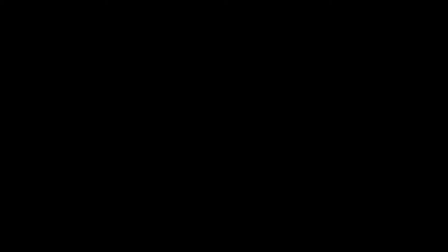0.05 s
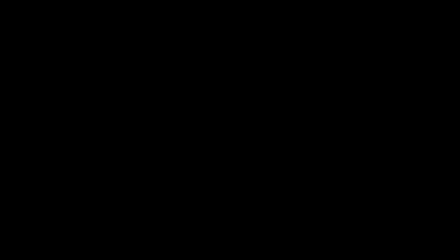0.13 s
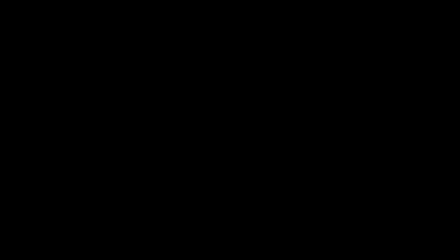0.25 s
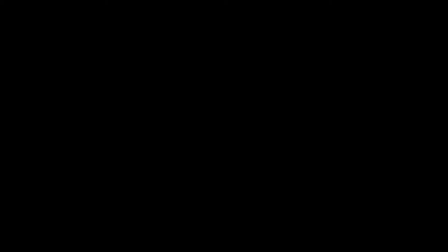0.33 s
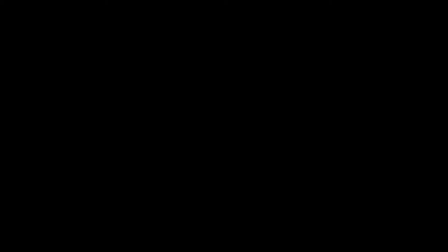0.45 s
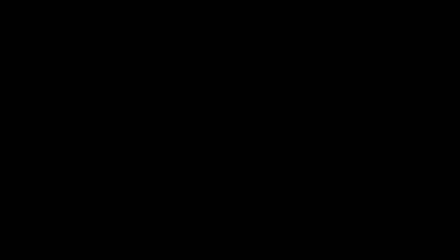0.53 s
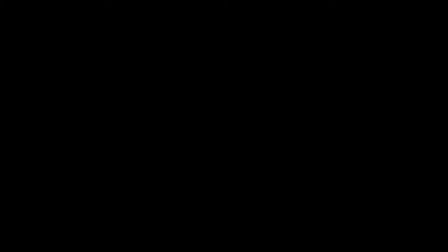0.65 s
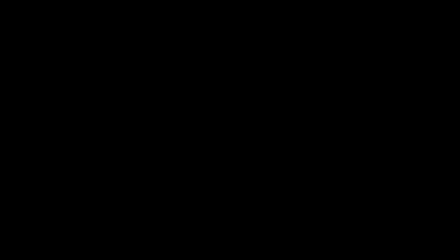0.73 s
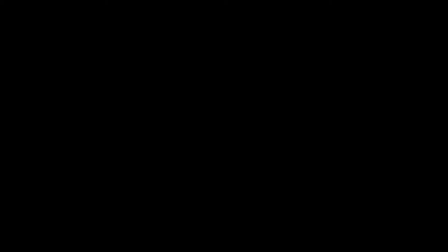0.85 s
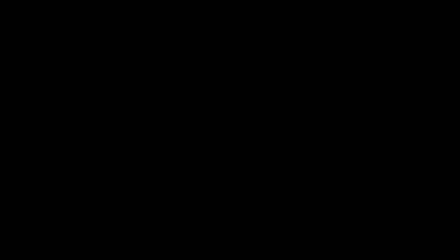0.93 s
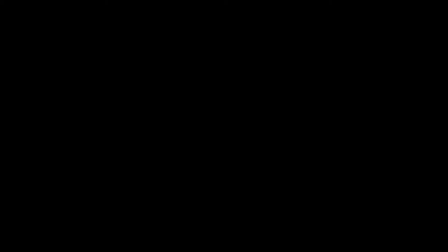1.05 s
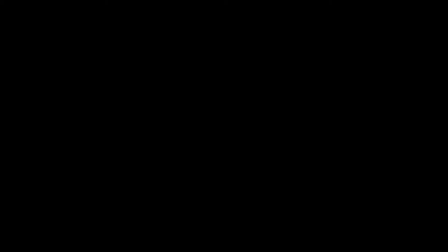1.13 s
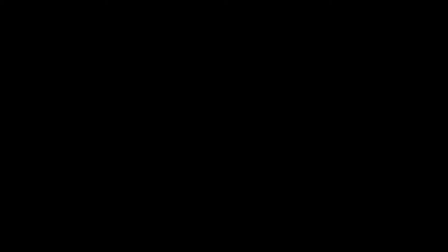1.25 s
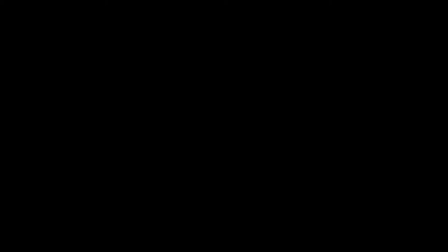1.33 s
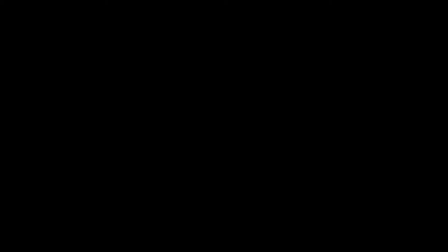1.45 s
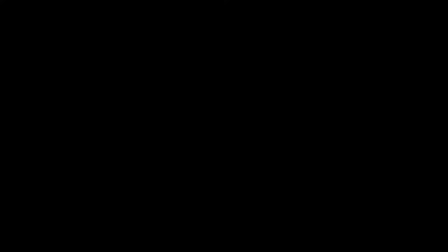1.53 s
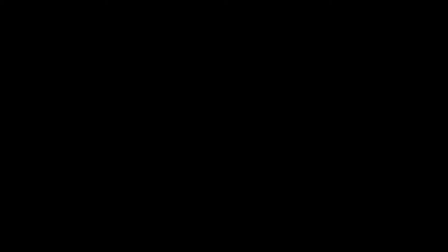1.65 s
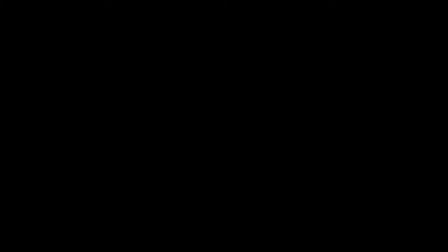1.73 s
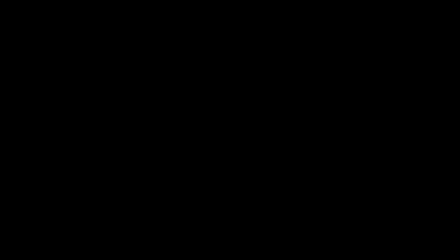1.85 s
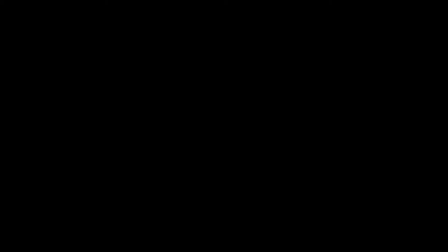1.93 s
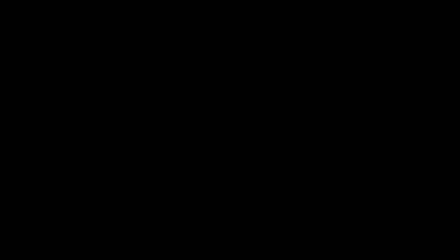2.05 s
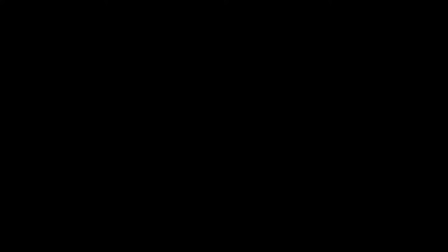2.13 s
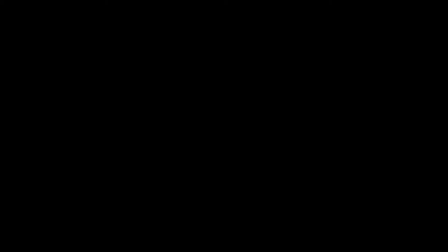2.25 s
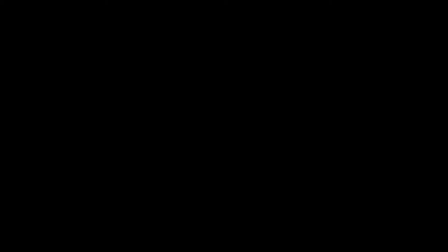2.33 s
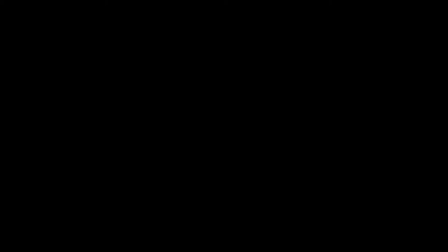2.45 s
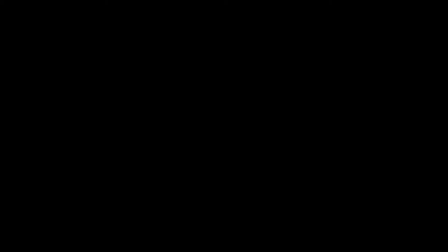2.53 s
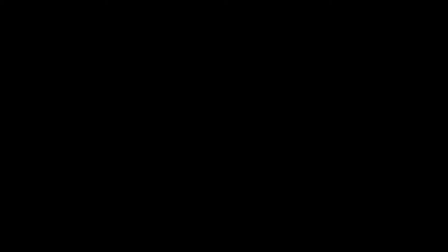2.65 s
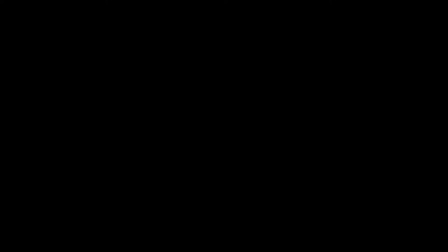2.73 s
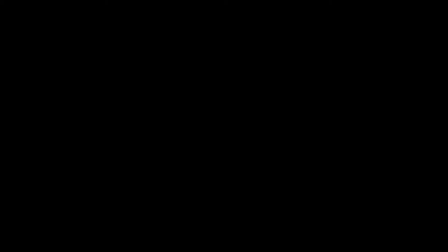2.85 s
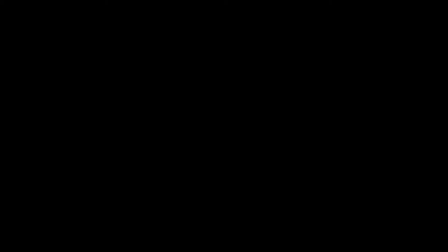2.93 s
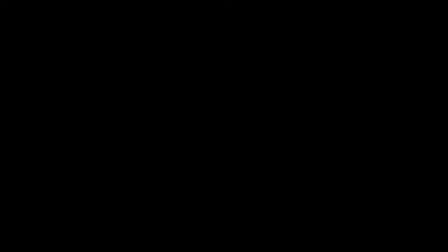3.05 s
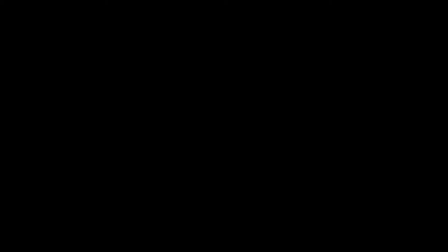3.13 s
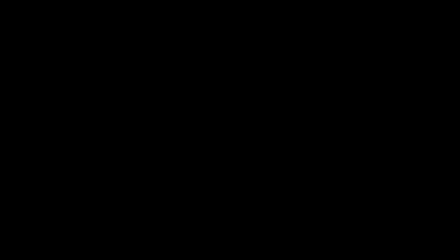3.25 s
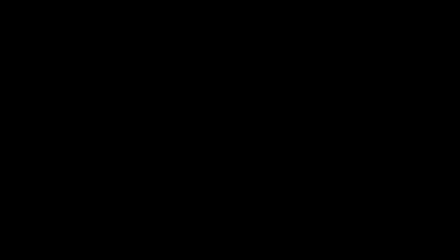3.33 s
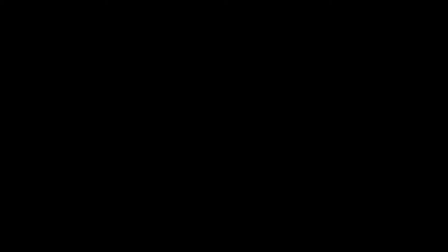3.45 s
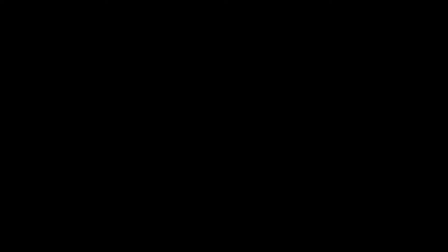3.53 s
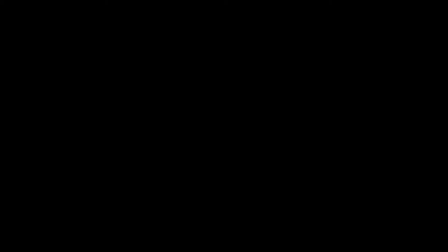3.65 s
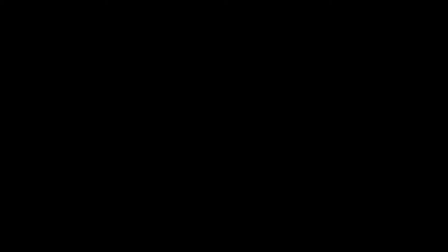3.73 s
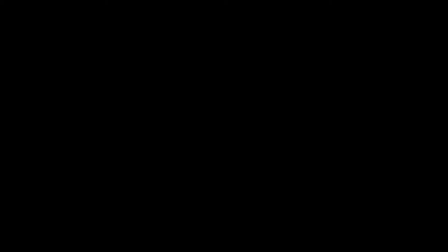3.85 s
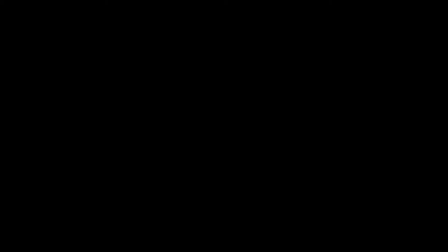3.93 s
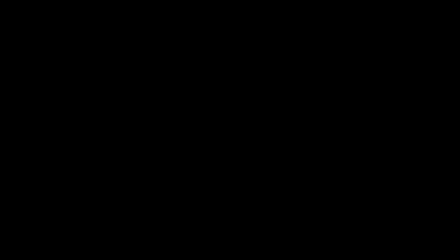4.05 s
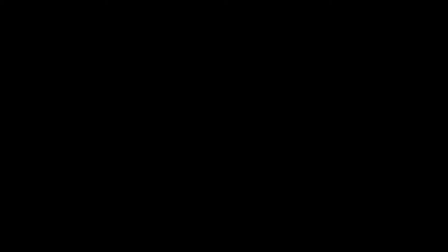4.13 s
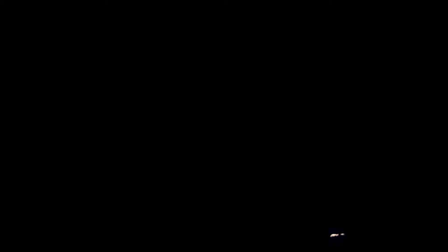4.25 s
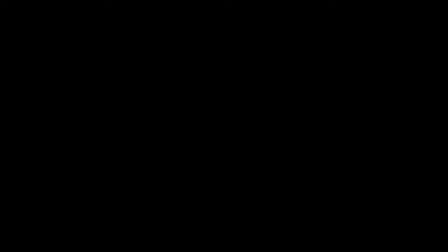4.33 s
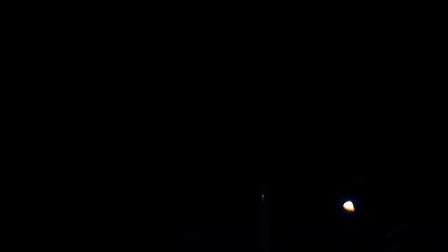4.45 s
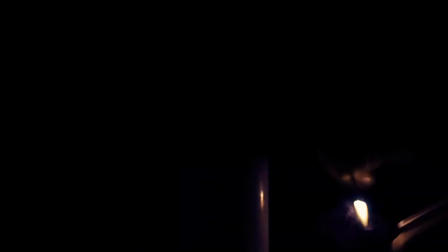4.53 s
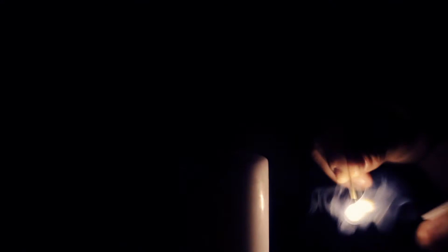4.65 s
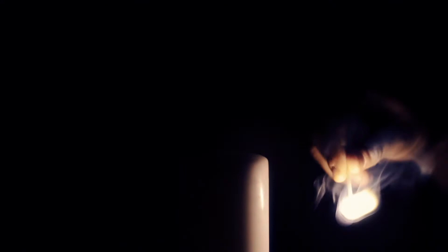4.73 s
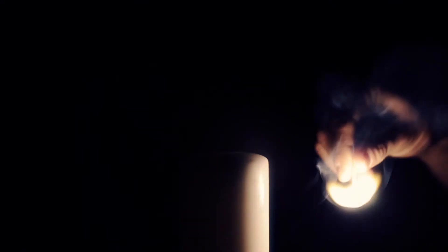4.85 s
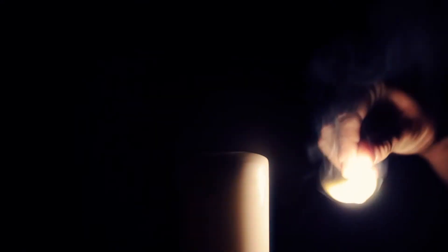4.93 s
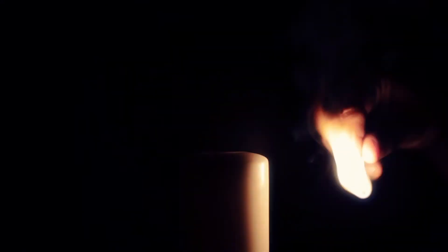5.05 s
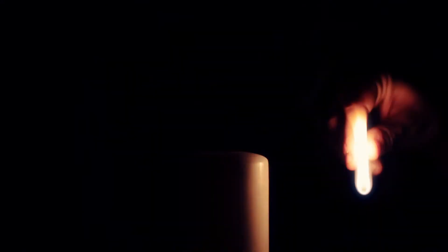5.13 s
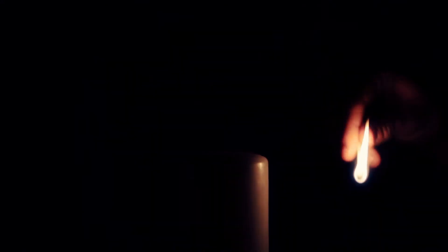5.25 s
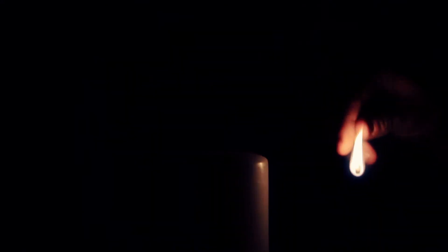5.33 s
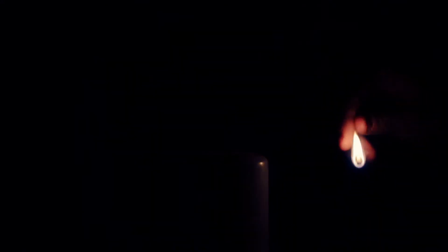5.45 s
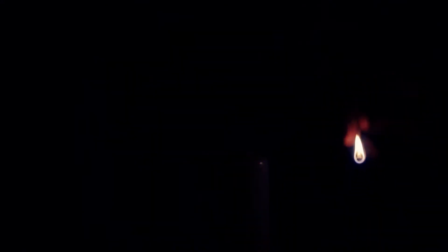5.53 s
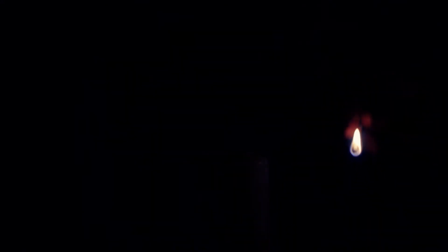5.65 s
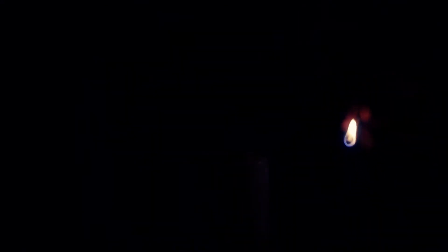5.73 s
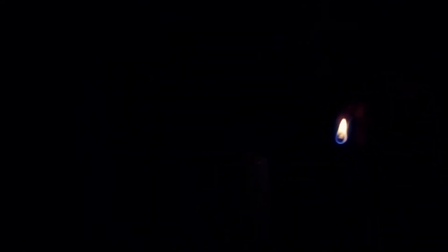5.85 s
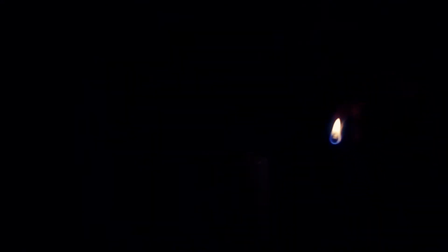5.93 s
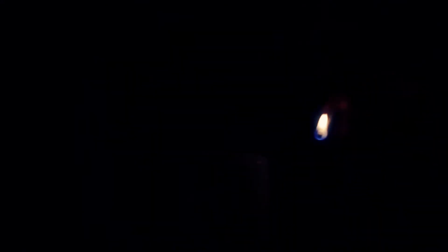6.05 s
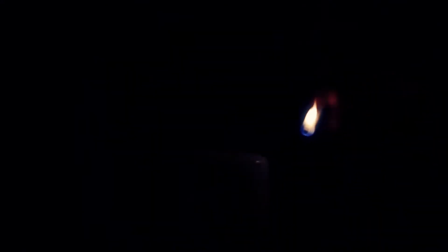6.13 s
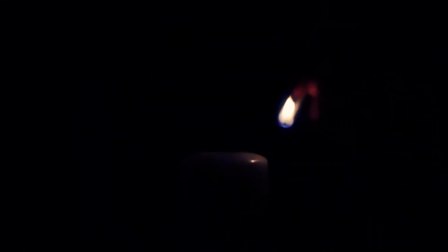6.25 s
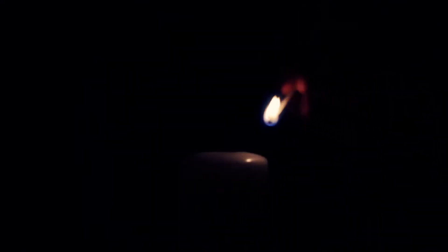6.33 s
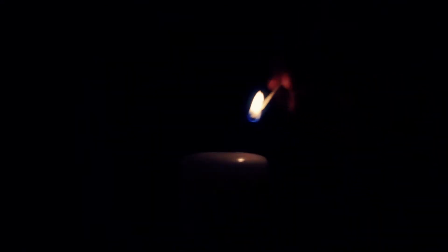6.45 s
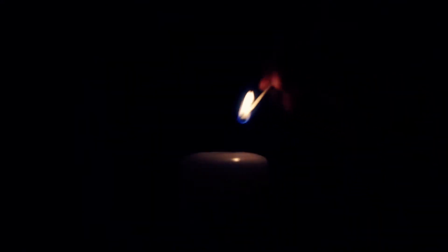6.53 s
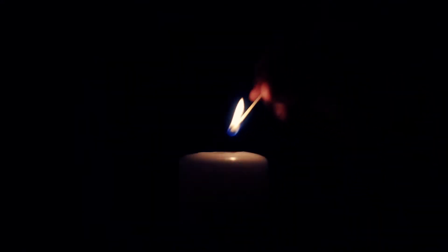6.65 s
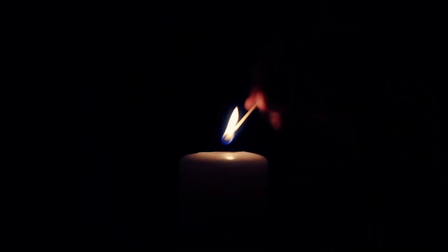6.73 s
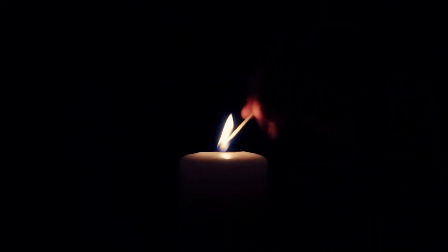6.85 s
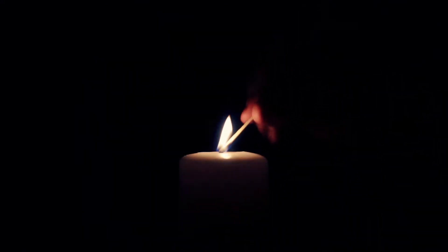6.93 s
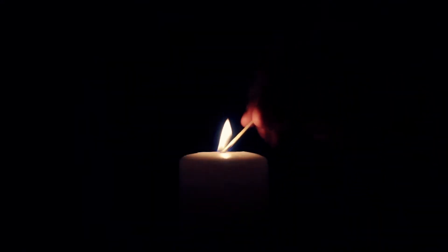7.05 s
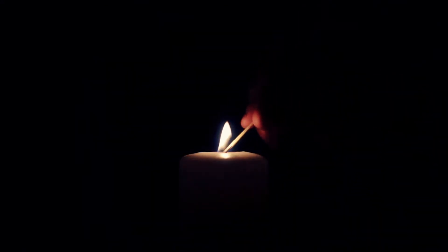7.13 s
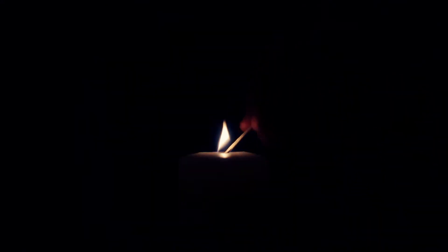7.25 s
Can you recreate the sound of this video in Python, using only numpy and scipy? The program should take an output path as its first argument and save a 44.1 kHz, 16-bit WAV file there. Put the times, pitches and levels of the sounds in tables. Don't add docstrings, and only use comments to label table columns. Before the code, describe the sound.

Close matchbox handling with sliding card and clicking wooden sticks, a pause, one short striker rasp, a soft gassy flare, then faint hiss and whine.

```python
import sys
import numpy as np
from scipy import signal
from scipy.fft import rfft, irfft, next_fast_len
from scipy.io import wavfile
from scipy.ndimage import uniform_filter1d, map_coordinates

SR = 44100
rng = np.random.default_rng(int(sys.argv[2]) if len(sys.argv) > 2 else 0)


def log_audio(samples):
    frames = np.atleast_2d(samples).T
    limited = np.clip(frames, -1, 1)
    pcm = np.round(limited * 32767).astype(np.int16)
    wavfile.write(sys.argv[1], SR, pcm)


def field_ratio(decibels):
    return 10 ** (np.asarray(decibels, dtype=float) / 20)


N = 321727


def unit(x):
    return x / np.sqrt(np.mean(x ** 2) + 1e-20)


def along(points, hz):
    f, v = np.transpose(points)
    return np.interp(np.log(hz + 1), np.log(f + 1), v)


def curves(rows, outside=None):
    s, *cols = np.transpose(rows)
    return np.array([np.interp(np.arange(N) / SR, s, c, outside, outside) for c in cols])


def wobble(rate):
    knots = rng.standard_normal(int(N * rate / SR) + 4)
    return map_coordinates(knots, [np.arange(N) * rate / SR])


def filtered(x, response):
    m = next_fast_len(x.shape[-1] + 4096)
    spectrum = rfft(x, m) * response(np.fft.rfftfreq(m, 1 / SR))
    return irfft(spectrum, m)[..., :x.shape[-1]]


def band(f, centre, width):
    return 1j * f * width / (centre ** 2 - f * f + 1j * f * width)


def resonant(modes):
    def response(f):
        shape = sum((-1) ** k * field_ratio(db) * band(f, hz, width) for k, (hz, width, db) in enumerate(modes))
        return shape / np.sqrt(np.mean(abs(shape) ** 2))
    return response


def coloured(spectrum, count=1):
    return unit(filtered(rng.standard_normal((count, N)), lambda hz: field_ratio(along(spectrum, hz))))


def patchy(x, depth_db, wide, long):
    z = signal.stft(x, nperseg=256)[2]
    field = uniform_filter1d(rng.standard_normal(z.shape[1:]), size=wide, axis=0)
    field = unit(uniform_filter1d(field, size=long, axis=1))
    gain = field_ratio(depth_db * field - depth_db ** 2 * np.log(10) / 20)
    return signal.istft(z * gain, nperseg=256)[1][:, :N]


# time in seconds, left level in dB, right level in dB.
WHINE = [(.6, -60, -54), (1.0, -60.5, -49.5), (1.3, -55, -54), (1.7, -59.5, -53.5), (2.3, -74.5, -57),
         (2.6, -59.5, -56.5), (3.1, -61, -62), (3.8, -58, -58.5), (4.6, -61.5, -65.5), (5.0, -55, -68),
         (5.5, -60, -56.5), (7.3, -62.5, -62)]


def whine():
    t = np.arange(N) / SR
    phase = 1.5 * np.array([[1], [0]]) + .2 * wobble(9) + .1 * np.sin(2 * np.pi * 50 * t)
    level_db = curves(WHINE) + 5.5 + 0.69 * np.array([wobble(12), wobble(10)])
    line = field_ratio(level_db) * np.sin(2 * np.pi * 15625.5 * t + phase)
    return line + field_ratio(-88) * np.sin(2 * np.pi * 9451 * t)


# frequency in Hz, density in dB per Hz.
SELF_NOISE = [(100, 9), (300, 6.5), (800, 2.5), (2000, -3.5), (5000, -2), (8000, 0), (12000, 6),
              (14150, -0.5), (14600, -36)]


def self_noise():
    return field_ratio(-72.5) * coloured(SELF_NOISE, count=2)


# time in seconds, left and right in thousandths of full scale.
OFFSET = [(.6, 7.5, 13.2), (2.2, 11.3, 17), (2.215, 6.5, 9.5), (3.97, 8, 11), (4, 8.8, 12),
          (5.2, 9.2, 12.6), (5.25, 10.2, 13.5), (7.3, 10.6, 14.1)]
# start in seconds, step as a share of the offset.
HUNTS = [(1.012, -.22), (1.206, -0.31), (1.603, 0.25), (1.707, 0.18), (2.756, -0.29), (2.901, 0.068),
         (2.928, 0.0085), (2.965, 0.067), (3, 0.105), (3.027, 0.256), (3.058, 0.049), (3.083, 0.097),
         (3.106, 0.048), (3.185, 0.277), (3.254, 0.135), (3.288, 0.094), (3.337, 0.123), (3.369, 0.224),
         (3.399, 0.31), (3.484, 0.024), (3.503, -0.045), (3.548, 0.12), (3.564, 0.15), (3.588, 0.166)]


def offset():
    t = np.arange(N) / SR
    steps = sum(share * (t > s) * (t < s + 0.0072) for s, share in HUNTS)
    return -(1 + uniform_filter1d(steps, size=80)) * curves(OFFSET) / 1000


# time in seconds, thump level in dB.
STIR = [(.62, -67.5), (.75, -89), (1.0, -85), (1.15, -74.5), (1.4, -80), (2.15, -74.5), (2.23, -87),
        (2.4, -77), (2.7, -84.5), (2.78, -76), (3.5, -78.5), (3.57, -71), (3.65, -89), (4.0, -83.5),
        (4.1, -87), (5.15, -78), (5.25, -90), (7.3, -86.5)]
# frequency in Hz, density in dB per Hz.
LOW = [(20, -2.5), (60, -3), (125, -18.5), (300, -29.5), (1500, -41)]
THUMP = [(30, -7.5), (90, 8), (250, 0.5), (600, -16), (1500, -35.5)]


def handling():
    thump_db, = curves(STIR)
    air_db = -68 + 0.21 * (thump_db - thump_db.mean())
    air, thump = coloured(LOW, count=3), coloured(THUMP, count=3)
    rumble = field_ratio(air_db + 2.5 + 1.6 * wobble(44)) * (air[1:] + air[0] / 2)
    return rumble + field_ratio(thump_db + 7.5 + 4.2 * wobble(30)) * (.5 * thump[1:] + thump[0])


# frequency in Hz, width in Hz, level in dB.
EDGE = [(10000, 13000, -8), (13100, 5500, -3.5), (14300, 340, -6.5)]


def contact(rows, box_db, rattle_db, crack_s=.0029, widest_hz=1100):
    out, t = np.zeros((3, N + 1024)), np.arange(1024) / SR
    envelope = field_ratio(-60 * t / crack_s) * (1 - np.exp(-t / 0.00013)) + field_ratio(rattle_db - 60 * t / 0.04)
    for s, db, hz, box_hz, edge_db in rows:
        cracks = rng.standard_normal((3, 3, len(t))) * envelope
        stick = resonant([(hz, min(0.55 * hz, widest_hz), 0), (1.1 * hz, 2500, -9)])
        wall = resonant([(box_hz, 0.56 * box_hz, 0)])
        parts = np.array([filtered(c, body) for c, body in zip(cracks, (stick, wall, resonant(EDGE)))])
        parts[1] = filtered(parts[1], wall)
        parts /= np.linalg.norm(parts, axis=-1, keepdims=True)
        levels = field_ratio([db, db + box_db, db + edge_db])
        out[:, round(s * SR):][:, :len(t)] += np.tensordot(levels, parts, axes=1)
    return field_ratio(18.5) * out[:, :N]


BOX_HZ = 2262
LOOSE_DB, HELD_DB = -21.5, -33

# start in seconds, ring in dB, ring in Hz, edge relative in dB.
CLACKS = [(0.6661, -28, 6300, -1), (1.1442, -22.5, 5200, -11.5), (1.146, -35, 4500, -13),
          (1.148, -26, 4500, -15), (1.1627, -30.5, 5400, -9.5), (1.1865, -25.5, 5350, -9),
          (1.1934, -20.5, 4950, -4), (1.557, -38, 4360, 3.5), (1.777, -36.5, 5930, -5.5),
          (1.8629, -41.5, 2780, -0.5), (1.8745, -33, 4430, -13), (1.9025, -43, 4370, -15),
          (1.9469, -41.5, 2740, -5), (2.041, -36, 5380, 1.5), (2.0882, -37, 3560, 6.5),
          (2.1157, -42.5, 2700, -7), (2.1715, -28, 3520, 1.5), (2.1749, -25.5, 2720, 4),
          (2.1972, -26.5, 3720, -12), (2.2052, -31, 6800, 4), (2.3303, -51.5, 3780, 3.5),
          (2.3699, -32, 3400, -0.5), (2.3877, -42.5, 3940, -5), (2.4127, -39.5, 6660, 4),
          (2.4986, -40, 2840, -31), (2.629, -33.5, 2150, -19.5), (2.6298, -30.5, 4500, -12),
          (2.6741, -48, 5060, 6), (2.8096, -39.5, 3250, -14), (2.8435, -27.5, 4150, -8),
          (2.8448, -30, 3040, -9.5), (2.848, -32, 3080, -18), (3.2966, -37, 6550, -1.5),
          (3.301, -47.5, 6100, 8)]


def clacks():
    return contact([(s, db, hz, BOX_HZ, edge) for s, db, hz, edge in CLACKS], -1.5, LOOSE_DB)


# start in seconds, peak in dB, pitch in Hz.
KNOCKS = [(0.6665, -10.5, 900), (0.6665, -25.5, 450), (0.72, -38, 1250), (2.074, -44, 445),
          (2.17, -40.5, 497), (2.758, -42, 610), (2.845, -38.5, 585), (2.944, -45.5, 690),
          (3.051, -44.5, 434.6), (3.088, -52.5, 518), (2.81, -60, 450), (3.325, -49, 654),
          (3.449, -45, 955), (3.507, -53, 425), (3.551, -44, 447), (3.573, -47.5, 670), (3.9888, -43, 788),
          (3.9888, -36, 1600), (4.305, -54, 1006), (4.316, -43, 1200), (4.324, -46.5, 900),
          (4.3365, -25, 963), (4.57, -40.5, 576), (5.706, -51, 742)]


def knocks():
    out, t = np.zeros(N + 2048), np.arange(2048) / SR
    for s, db, hz in KNOCKS:
        decay = field_ratio(db - 60 * t * hz / 6.1)
        landing = 1 - np.exp(-t * hz / 0.17)
        out[round(s * SR):][:len(t)] += decay * landing * np.sin(2 * np.pi * hz * t)
    return out[:N]


# peak time in seconds, level in dB, seconds from touch to peak,
# seconds from peak to lift, grit edge relative in dB.
SLIDE = [(.675, -39.5, 0.0518, 0.027, 1.5), (.76, -34, 0.0715, 0.23, 2), (.935, -36, 0.063, 0.14, -1),
         (1.0, -38.5, 0.22, 0.036, -1.5), (1.043, -41, 0.0033, 0.012, 1.5), (1.093, -38.5, 0.035, 0.018, 5),
         (1.13, -39, 0.11, 0.02, 1), (1.164, -27, .004, .006, 0), (1.186, -32, 0.126, 0.029, 0.5),
         (1.238, -47, 0.15, .12, 0), (1.36, -58.5, 0.0205, 0.25, 3), (1.48, -57, 0.028, 0.16, 3)]
RUMMAGE = [(1.61, -32, 0.067, 0.0408, 1), (1.665, -44, 0.0225, 0.18, 0.5),
           (1.707, -32.5, 0.0223, 0.0474, -8), (1.779, -35.5, 0.059, 0.049, -1.5),
           (1.872, -43, 0.071, 0.034, -2.5), (1.909, -47.5, 0.044, 0.063, -8),
           (1.951, -40.5, 0.061, 0.22, -6), (2.042, -33.5, 0.00166, 0.0443, -12.5),
           (2.076, -29, 0.0049, 0.0237, -13.5), (2.11, -46.5, 0.0117, 0.116, -6),
           (2.17, -38, 0.043, .02, -11.5), (2.21, -29.5, 0.066, 0.0223, -3.5), (2.231, -61, .02, 0.034, -5),
           (2.267, -41, 0.033, 0.0042, -16), (2.36, -44.5, 0.216, 0.02, -2),
           (2.37, -33.5, 0.0035, 0.0302, 2), (2.411, -38, 0.0117, 0.029, -7.5),
           (2.502, -44, 0.176, 0.0343, -5.5), (2.585, -40.5, 0.073, 0.074, 2.5),
           (2.588, -33, 0.0055, 0.0415, -1), (2.628, -32, 0.0767, 0.0075, -1.5),
           (2.7, -55.5, 0.275, 0.46, 0.5), (2.751, -43.5, 0.0043, 0.1845, 4.5),
           (2.847, -41.5, 0.0029, 0.0682, 1.5)]
PICK = [(2.95, -79, 0.0186, 0.175, -14), (3.006, -61.5, .003, 0.0507, -8),
        (3.047, -46.5, 0.0081, 0.0655, 5.5), (3.15, -63, 0.124, 0.113, 3),
        (3.299, -47.5, 0.0423, 0.0503, 4), (3.41, -61, 0.069, 0.014, -0.5),
        (3.447, -35, 0.00176, 0.0203, -6), (3.5, -57, 0.225, 0.204, -2), (3.544, -53, .003, 0.07, 0),
        (3.63, -73.5, .011, 0.59, 6)]
STRIKE = [
    (4.339, -34.5, 0.00503, 0.024, -0.5),
    (4.362, -28.5, 0.029, 0.0085, -10.5),
    (4.372, -48.5, .003, 0.044, 7),
]


def pressure(strokes):
    t, touch = np.arange(N) / SR, 0.0019
    shapes = []
    for s, db, before, after, _ in strokes:
        times = s + np.array([-before - touch, -before, 0, after, after + touch])
        shapes.append(np.interp(t, times, db - np.array([60, 17, 0, 17, 60]), -140, -140))
    shapes = np.array(shapes)
    edge_db = np.transpose(strokes)[-1][shapes.argmax(axis=0)]
    return uniform_filter1d(field_ratio(shapes.max(axis=0) + [0 * t, edge_db]), size=60)


def gritty(depth_db):
    jumps = wobble(1400) + .7 * wobble(300) + .6 * wobble(70)
    return unit(rng.standard_normal((3, N)) * field_ratio(depth_db * jumps))


# frequency in Hz, width in Hz, level in dB.
CARD = [(4500, 2100, 4.5), (7200, 1300, -0.5)]
HOLLOW = [(1971, 960, 2), (900, 3800, -12.5)]
GRIPS_DB = [-4, -2, 0, -2.5]
# time in seconds, step up the ladder.
GRIP = [(.6, 0.657), (1.25, 1.734), (1.55, 1.95), (1.8, 1.53), (1.9, 1.71), (2.1, 1.96), (2.2, 1.91),
        (2.4, 3.4), (2.5, 2.485), (2.6, 3.037), (2.85, 1.814), (3.0, 1.175), (3.35, 0.404), (3.6, 1.18),
        (4.3, 0.45)]
LADDER = [.76, 1, 1.24, 1.52]


def hollow_box(shake):
    step = np.clip(curves(GRIP)[0], 0, len(LADDER) - 1)
    box = 0
    for k, up in enumerate(LADDER):
        share = np.sqrt(np.clip(1 - abs(step - k), 0, 1))
        box = box + filtered(shake * share, resonant([(up * hz, up * width, db) for hz, width, db in HOLLOW]))
    return box


def rubbing():
    forces = [pressure(strokes) for strokes in (SLIDE, RUMMAGE, PICK, STRIKE)]
    actions, edges = np.transpose(forces, axes=(1, 0, 2))
    grit = gritty(depth_db=2.5)
    drag, bend = field_ratio(-6.5) * actions.sum(axis=0) * grit, wobble(21)
    bent = [(1.0683 * hz, width / 2, db) for hz, width, db in CARD]
    card = filtered(drag * np.cos(bend), resonant(CARD))
    card += filtered(drag * abs(np.sin(bend)), resonant(bent))
    damping = field_ratio(-1.5 + 0.63 * wobble(17))
    box = hollow_box(damping * (field_ratio(GRIPS_DB) @ actions) * grit)
    edge = field_ratio(-4.5) * filtered(edges.sum(axis=0) * gritty(depth_db=1.5), resonant(EDGE))
    rub = patchy(card + edge, depth_db=2.5, wide=3, long=12) - box
    rub = filtered(rub, lambda f: 1j * f / (597 + 1j * f))
    return rub - 0.8 * filtered(rub, lambda f: band(f, 3000, 1200))


# start in seconds, ring in dB, ring in Hz, edge relative in dB.
SNAPS = [(.703, -40, 6690, 2.5), (1.123, -41, 4828, -4.5), (1.157, -35, 4740, -14.5),
         (1.1832, -16.5, 5000, -1.5), (1.1834, -22.5, 7803, -9.5), (1.198, -20, 4738, -5),
         (1.203, -36, 4610, -21), (1.2163, -32, 4500, -9.5), (1.2214, -34, 4800, -8),
         (1.2493, -42.5, 5126, -14.5), (1.2777, -45, 5300, -13), (1.574, -35, 4500, -7.5),
         (1.5959, -32, 5000, -3), (1.603, -34.5, 4500, -3), (2.0602, -40, 4000, -6),
         (2.8642, -42, 4000, -0.5), (1.6164, -25, 5798, 4), (1.6381, -33.5, 4360, -6),
         (1.6398, -23.5, 4273, -5.5), (1.71, -30, 4963, -1.5), (1.7126, -27.5, 5000, -6),
         (1.6973, -25.5, 5700, -3), (1.7138, -14.5, 5057, -6.5), (1.7628, -41.5, 3620, -5.5),
         (1.7811, -34.5, 3765, 6.5), (1.8105, -36, 5760, -9.5), (1.9731, -38, 5000, -19.5),
         (2.0496, -37, 5150, -29.5), (2.2092, -23, 6500, -2.5), (2.2102, -13, 6220, -8),
         (2.2165, -32.5, 7000, -5.5), (2.258, -25, 5990, -13.5), (2.2623, -39.5, 4600, -6.5),
         (2.6238, -37.5, 6950, -10.5), (2.629, -37, 6930, -19), (2.7159, -50.5, 5240, -10.5),
         (2.89, -37, 6810, 2.5), (3.0516, -43, 3530, -1.5), (3.4485, -33.5, 6200, -29.5),
         (3.458, -44, 6600, -3), (3.94, -62, 6115, -13.5), (3.95, -58, 5500, -16.5), (4.04, -59, 4810, -12),
         (4.0893, -60.5, 5870, -7.5), (4.206, -61.5, 5070, -3), (4.289, -62.5, 5500, -5)]


def snaps():
    return contact([(s, db, hz, BOX_HZ, edge) for s, db, hz, edge in SNAPS], -13, LOOSE_DB)


# start in seconds, peak in dB, box in Hz.
TAPS = [(1.04, -48.5, 2040), (1.135, -34.5, 2030), (1.177, -33.5, 1980), (1.315, -49, 1790),
        (1.57, -37.5, 1530), (1.737, -33.5, 1410), (1.84, -42, 1440), (1.88, -35, 2040), (2.079, -36, 2420),
        (2.099, -35.5, 2350), (2.155, -38, 2100), (2.261, -43, 2150), (2.2947, -44.5, 2320),
        (2.432, -38, 2100), (2.466, -41.5, 2580), (2.501, -43, 3200), (2.627, -62, 1190), (2.76, -58, 2800),
        (2.813, -43, 2240), (2.862, -47.5, 1380), (2.941, -36, 1855), (3.015, -41.5, 1634),
        (3.3, -44, 1340), (3.321, -43.5, 1410), (3.339, -43, 1530), (3.361, -49, 1520),
        (3.439, -40.5, 1520), (3.551, -46, 1200), (3.737, -58.5, 966), (4.566, -56, 1100),
        (4.567, -40, 1610), (4.609, -45, 2353)]


def taps():
    return contact([(s, db - 6, 4100, hz, -3) for s, db, hz in TAPS], 7.5, LOOSE_DB)


# start in seconds, level in dB, ring in Hz.
TICKS = [(1.041, -39.5, 10200), (1.1215, -32.5, 11740), (1.1516, -29.5, 11500), (1.1898, -22, 11180),
         (1.1927, -33, 11300), (1.225, -36.5, 11760), (1.9539, -36, 13750), (2.0754, -32, 11900),
         (2.1584, -40, 12000), (2.2933, -38, 11540), (2.5902, -29.5, 12970), (2.6089, -28.5, 12760),
         (2.8233, -45, 12500), (2.9406, -55.5, 11400), (2.979, -50, 11360), (3.0005, -66.5, 12200),
         (3.1805, -55, 9580), (3.2429, -58.5, 9860), (3.2796, -39, 9400), (3.3377, -46.5, 11300),
         (3.3605, -48.5, 10500), (3.389, -56, 5440), (3.4559, -40, 11980), (3.5003, -52.5, 11400),
         (3.5473, -53, 12400), (6.7584, -55, 12500)]


def ticks():
    return contact([(s, db, hz, BOX_HZ, -6.5) for s, db, hz in TICKS], -30.5, HELD_DB, crack_s=0.0026)


# start in seconds, level in dB, ring in Hz.
BITES = [(3.9869, -37, 4090), (3.9887, -42, 6100), (3.9882, -35.5, 9730), (4.3436, -26, 8500),
         (4.3475, -26.5, 12020), (4.3492, -18, 10840), (4.3515, -32, 11900), (4.3532, -19.5, 12500),
         (4.3588, -27.5, 11000), (4.3611, -16, 13400), (4.3616, -23.5, 8470), (4.3638, -20, 12600),
         (4.365, -35.5, 13000), (4.3655, -26.5, 13100), (4.367, -35, 13400)]


def bites():
    rows = [(s, db, hz, BOX_HZ, -5.5) for s, db, hz in BITES]
    return contact(rows, -30.5, HELD_DB, crack_s=0.002, widest_hz=1650)


# start in seconds, ring in dB, ring in Hz.
SKIPS = [
    (4.3358, -33.5, 7000),
    (4.3372, -34.5, 3960),
    (4.3436, -29.5, 4370),
    (4.349, -30, 4360),
    (4.352, -29, 3860),
    (4.361, -28.5, 3580),
    (5.7054, -59.5, 6050),
]


def skips():
    return contact([(s, db, hz, BOX_HZ, -1) for s, db, hz in SKIPS], -10, HELD_DB)


# time in seconds, gas flow in dB, thin jet relative in dB.
FLARE = [
    (4.4, -60.5, -31),
    (4.54, -57, -4),
    (4.565, -50.5, -28),
    (4.61, -50.5, -3),
    (4.72, -51.5, -5),
    (5.05, -46.5, -13.5),
    (5.14, -52, 0.5),
    (5.171, -53, -5.5),
    (5.19, -97.5, -6),
]
# frequency in Hz, density in dB per Hz.
HISS = [(700, -56), (1500, -13.5), (3000, -5.5), (4800, -4), (6300, -2), (9000, -3), (12000, -1),
        (15500, -5.5), (16200, -40.5)]
ROAR = [(30, -10.5), (100, 2.5), (250, -6), (600, -4.5), (1500, -9), (4000, -30)]
# frequency in Hz, width in Hz, level in dB.
JET = [(10500, 3300, -3), (6200, 330, 0.5)]


def flame():
    flow_db, jet_db = curves(FLARE, outside=-120)
    flutter_db = 0.55 * wobble(40) + 0.79 * wobble(330)
    jet = field_ratio(jet_db) * filtered(rng.standard_normal((3, N)), resonant(JET))
    gas = patchy(coloured(HISS, count=3) + jet, depth_db=2.4, wide=3, long=40)
    hiss = field_ratio(flow_db + 3.5 + flutter_db) * gas
    burnt = np.arange(N) > FLARE[-1][0] * SR
    ember = field_ratio(-74.5) * burnt * coloured(HISS[:-2] + SELF_NOISE[-2:], count=3)
    roar = field_ratio(flow_db - 9 + .6 * wobble(25)) * coloured(ROAR, count=3)
    return hiss + ember + roar


# frequency in Hz, t60 in seconds.
WALLS = [(200, 0.9), (2000, 0.15), (10000, 0.16)]


def tails():
    hz, t, z = signal.stft(rng.standard_normal((2, int(0.37 * SR))), SR, nperseg=128)
    t60 = along(WALLS, hz)[:, None]
    tail = signal.istft(z * field_ratio(-60 * t / t60), SR, nperseg=128)[1]
    return tail / np.linalg.norm(tail[0])


def ports(x, shadow, scatter, scatter_db, bend=((0, 0),)):
    own = lambda hz: field_ratio(along(scatter, hz) + scatter_db)
    direct = filtered(x[0], lambda hz: 1 / np.hypot(1, own(hz)))
    direct = direct + filtered(x[1:], lambda hz: own(hz) / np.hypot(1, own(hz)))
    late = np.pad(x[0], (250, 0))[None]
    walls = signal.fftconvolve(late, tails(), axes=1)[:, :N]
    far = lambda hz: field_ratio(along(shadow, hz)) * np.exp(-2j * np.pi * hz * along(bend, hz) / SR)
    return filtered(direct, lambda hz: np.array([far(hz), 1 + 0 * hz])) + field_ratio(-24) * walls


def moved(pair, path):
    lag, left_db = curves(path)
    left = map_coordinates(pair[0], [np.arange(N) - lag], order=5)
    return np.array([field_ratio(left_db) * left, pair[1]])


# frequency in Hz, level in dB.
SHADOW = [(300, -3.5), (2000, -5), (2800, -2), (3400, -1), (4300, -5), (9000, -6), (14000, -8)]
SCATTER = [(300, -25), (2000, -10), (2900, -5.5), (3500, -9), (5000, -2.5), (10000, -2.5), (15000, 11.5)]
# time in seconds, left port's lag in samples, left level in dB.
SWAY = [(.6, 8.74, -4.5), (.78, 7.4, 1.5), (1.0, 7.6, 0), (1.1, 7.8, -1.5), (1.3, 6.83, 0), (1.7, 8.62, 0),
        (1.85, 7.45, 0), (2.05, 7.25, 2), (2.2, 8.13, -2.5), (2.5, 5.68, 2.5), (2.8, 6.87, 2),
        (3.0, 7.6, 1.5), (3.2, 7.7, -0.5), (3.4, 7.9, 0.5), (3.698, 8.58, 1.5), (4.201, 7.63, 1.5),
        (4.3, 7.83, 0)]


def box_at_right(sound):
    return moved(ports(sound, SHADOW, SCATTER, scatter_db=0.5), SWAY)


# frequency in Hz, level in dB.
FLAME_SHADOW = [(300, -1.5), (1500, -5), (3200, 0), (4800, -2.5), (6300, -4), (14000, -2)]
FLAME_SCATTER = [(300, -14.5), (1200, -8), (2200, -3.5), (3400, -9), (4600, -12.5), (6800, -4.5),
                 (10000, -5.5), (15000, -2.5)]
# frequency in Hz, delay in samples.
FLAME_BEND = [(700, 0), (1400, -.9), (2200, -.2), (3000, 1.2), (3500, 1.3), (4200, -0.048), (5000, 0)]
# time in seconds, left port's lag in samples, left level in dB.
CARRY = [
    (4.45, 4.5, 0.5),
    (4.62, 4.59, 2),
    (4.8, 5.18, -1),
    (4.95, 5.2, 0),
    (5.2, 4.173, 0),
]


def carried_flame(sound):
    return moved(ports(sound, FLAME_SHADOW, FLAME_SCATTER, scatter_db=0.15, bend=FLAME_BEND), CARRY)


def scene():
    box = clacks() + knocks() + rubbing() + snaps() + taps() + ticks() + bites() + skips()
    return whine() + handling() + box_at_right(box) + carried_flame(flame())


# frequency in Hz, level in dB.
TOP = [(15720, 0), (15880, -16), (16300, -32)]


def treble_end(dry):
    return filtered(dry, lambda hz: field_ratio(along(TOP, hz)))


def top_cut(x):
    return signal.sosfilt(signal.butter(12, 16960, fs=SR, output="sos"), x)


def record(dry):
    is_open = np.arange(N) > .6137 * SR
    mix = (treble_end(dry) + self_noise() + offset()) * is_open
    return top_cut(mix)


dry = scene()
out = record(dry)
log_audio(out)
```